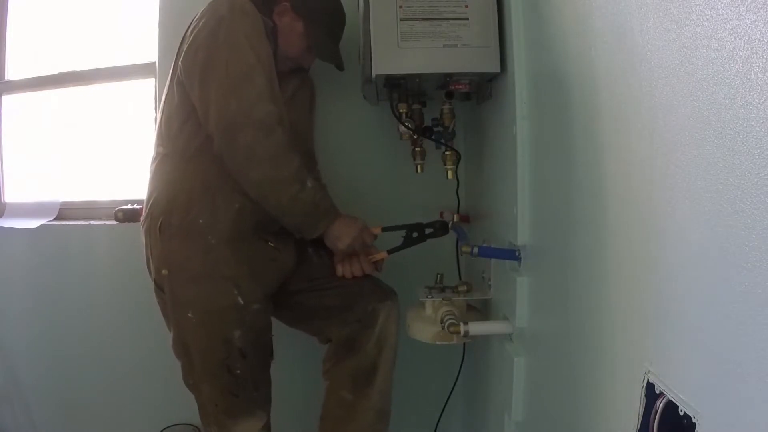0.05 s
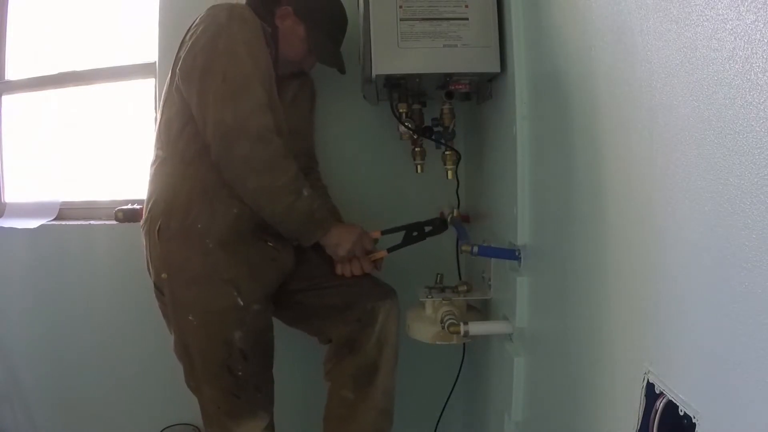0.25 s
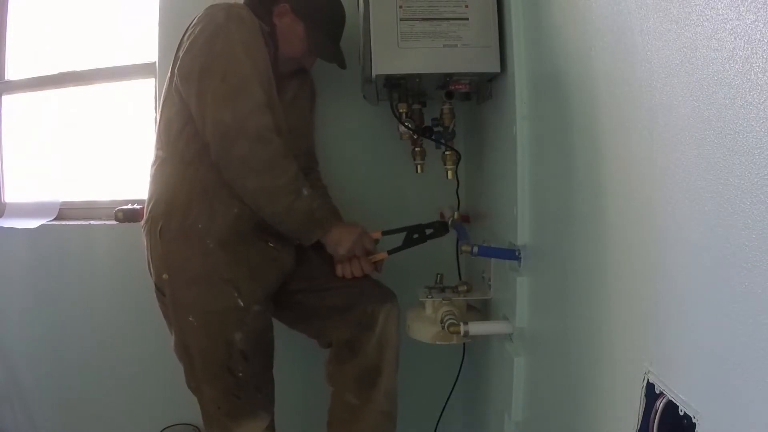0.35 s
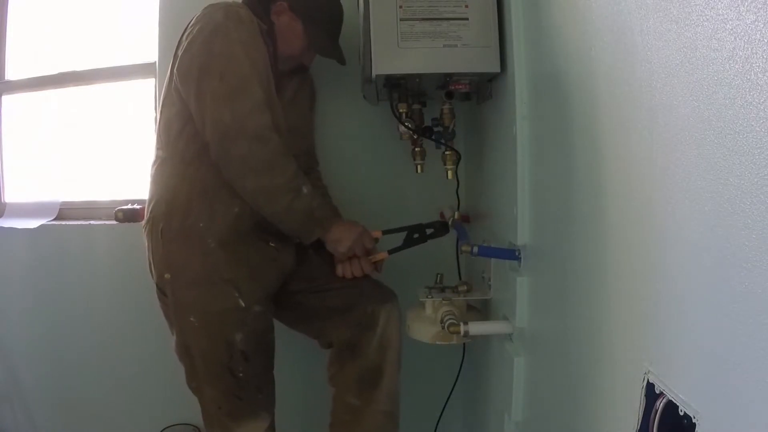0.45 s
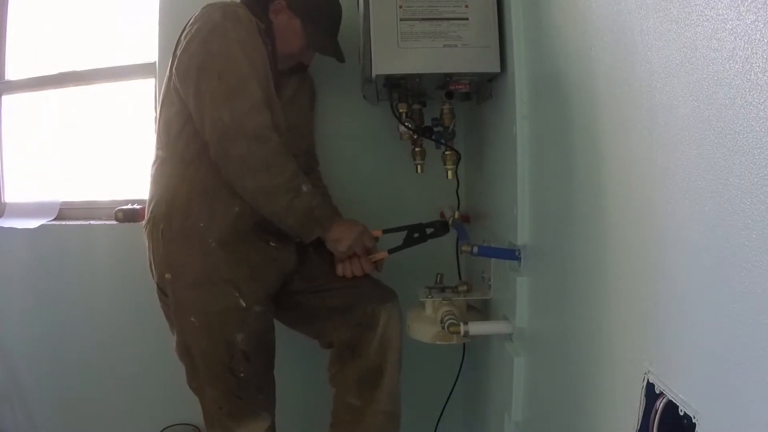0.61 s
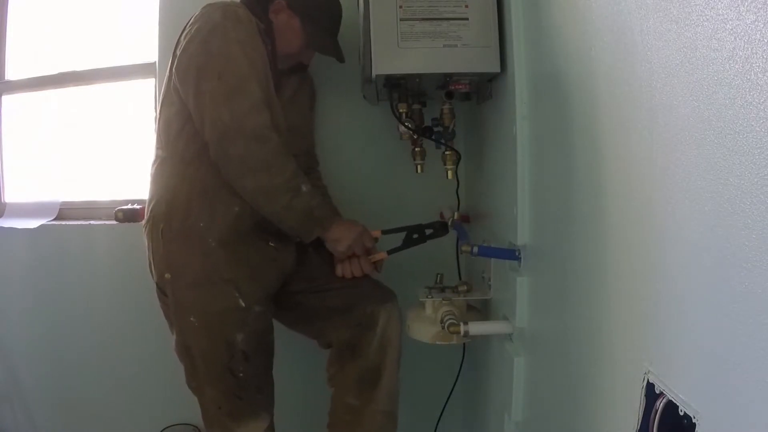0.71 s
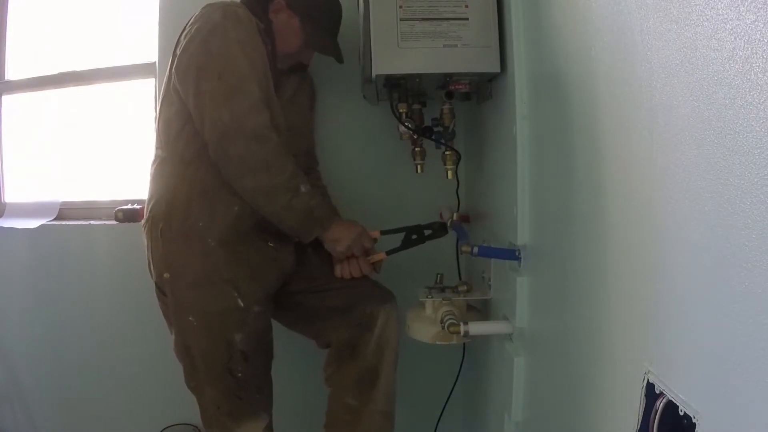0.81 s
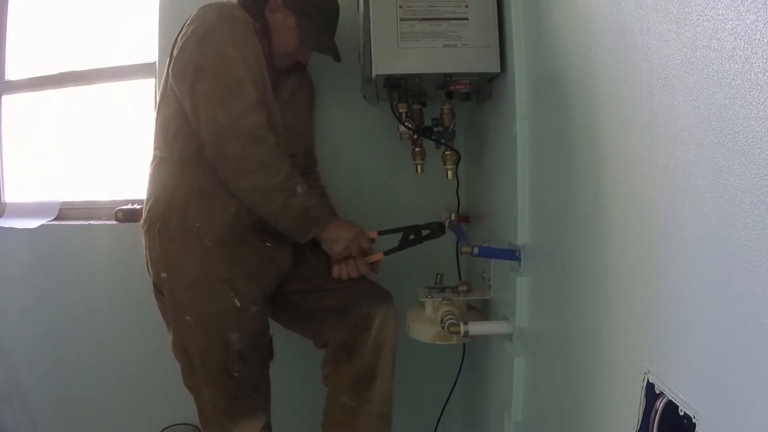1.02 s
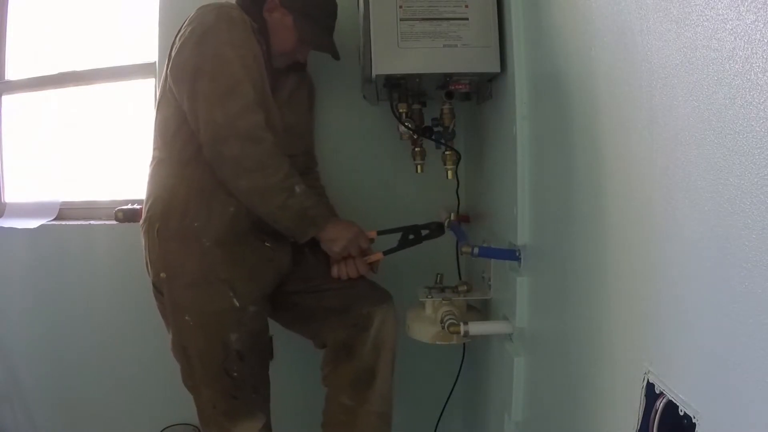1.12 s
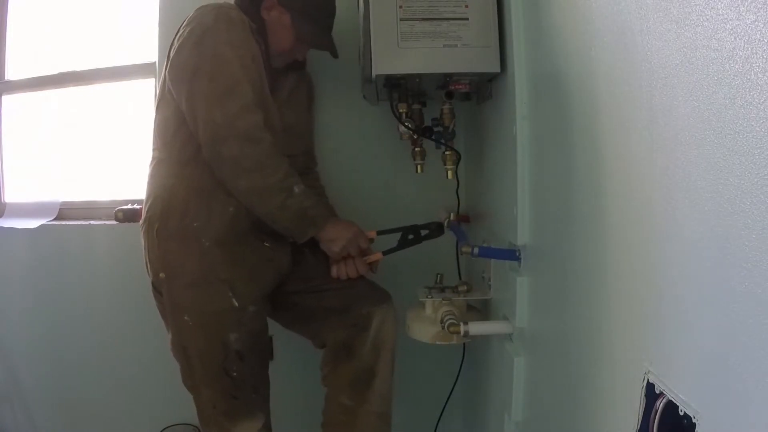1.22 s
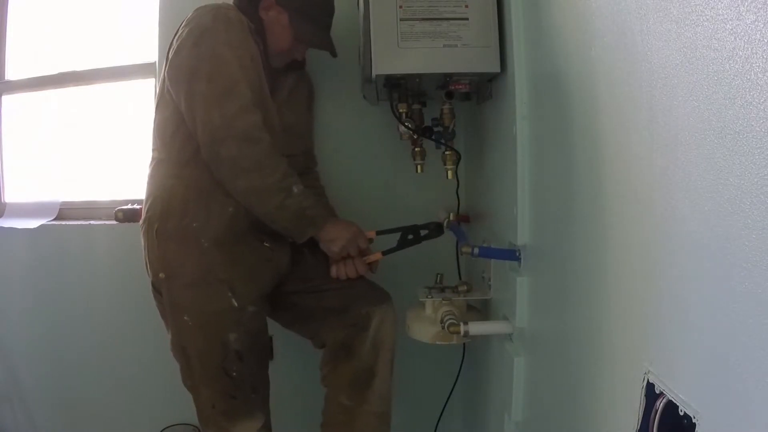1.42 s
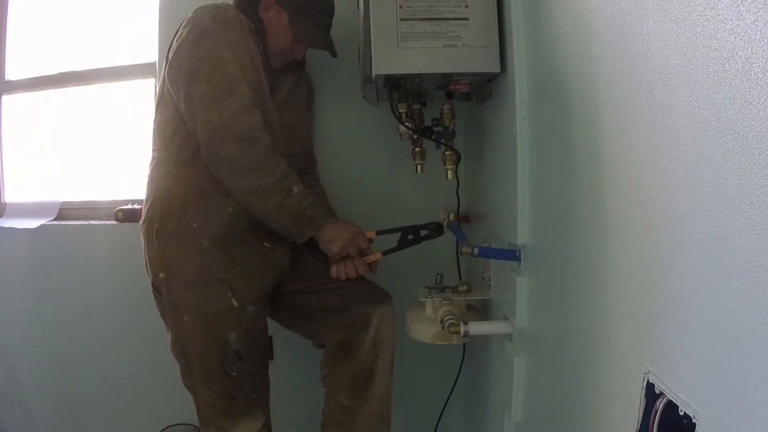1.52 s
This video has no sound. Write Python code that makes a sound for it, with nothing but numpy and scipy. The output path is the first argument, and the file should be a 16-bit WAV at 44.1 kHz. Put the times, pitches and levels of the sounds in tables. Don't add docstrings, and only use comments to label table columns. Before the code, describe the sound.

A hand crimping tool clicks four times through its ratchet, then snaps with a sharp loud crack in a bare hard room; later a small steel scrap pings and the tool knocks dully on pipes, close microphone.

```python
import sys
import numpy as np
from scipy import signal
from scipy.io import wavfile
from scipy.ndimage import uniform_filter1d

SR = 44100
rng = np.random.default_rng(int(sys.argv[2]) if len(sys.argv) > 2 else 0)


def materialize(psi):
    bounded = np.clip(np.atleast_2d(psi).T, -1, 1)
    quanta = np.round(bounded * 32767).astype(np.int16)
    wavfile.write(sys.argv[1], SR, quanta)


def nominal_scale(level):
    x = np.asarray(level, float) / 20
    return 10 ** x


N = 68355
LEAD_S = 0.12
FULL_N = N + round(LEAD_S * SR)


def evened(x):
    return x / np.sqrt(np.mean(x ** 2) + 1e-20)


def read(points, hz):
    f, value = np.transpose(points)
    return np.interp(np.log(hz + 1), np.log(f + 1), value)


def add(mix, start_s, sound):
    part = mix[..., round((start_s + LEAD_S) * SR):][..., :sound.shape[-1]]
    part += sound[..., :part.shape[-1]]


def rings(modes, spread_db=0, rise_s=0):
    t = np.arange(SR) / SR
    out = np.zeros(SR)
    for hz, db, t60, *sign in modes:
        level_db = db + spread_db * rng.standard_normal() - 60 * t / t60
        out += nominal_scale(level_db) * np.sin(2 * np.pi * hz * t) * np.prod(sign)
    if rise_s:
        out *= 1 - np.exp(-t / rise_s)
    return out


def crack(colour, t60):
    def causal(log_gain):
        return np.fft.ifft(np.exp(np.conj(signal.hilbert(log_gain)))).real[:2048]

    log_gain = np.log(nominal_scale(read(colour, abs(np.fft.fftfreq(4096, 1 / SR)))))
    burst = rng.standard_normal(2048) * nominal_scale(-60 * np.arange(2048) / SR / t60)
    chance = uniform_filter1d(abs(np.fft.fft(burst, 4096)) ** 2, size=61, mode="wrap")
    noise = signal.fftconvolve(burst, causal(log_gain - 0.5 * np.log(chance)))
    noise = np.pad(noise, (0, SR))[:SR]
    pulse = np.pad(causal(log_gain), (0, SR))[:SR]
    pulse *= np.linalg.norm(noise) / np.linalg.norm(pulse)
    return np.array([noise, pulse]) / abs(noise).max()


def room(x, wet_db, thin=True):
    # (frequency [Hz], time to fall 60 dB [s])
    tail_times = [(100, .8), (300, 1), (900, 0.96), (2000, 0.88), (4000, 0.75), (8000, 0.52), (14000, 0.41)]
    # (time [s], level [dB])
    reflections = [(.0026, -7), (.0075, -9.5), (.011, -8), (0.0158, -9.5), (0.0187, -18), (0.022, -14)]
    early_db, early_t60, build_s = 5, 0.19, 0.012
    hz, t, z = signal.stft(rng.standard_normal(FULL_N), SR, nperseg=512)
    z = z * nominal_scale(-60 * t / read(tail_times, hz)[:, None])
    tail = signal.istft(z, SR, nperseg=512)[1][:FULL_N]
    t = np.arange(len(tail)) / SR
    tail = tail * (1 + nominal_scale(early_db - 60 * t / early_t60)) * (1 - np.exp(-t / build_s))
    tail = nominal_scale(wet_db) * tail / np.linalg.norm(tail)
    echoes = np.zeros(len(tail))
    echoes[0] = 1
    for delay_s, db in reflections:
        echoes[round(delay_s * SR)] = nominal_scale(db) * rng.choice([-1, 1])
    direct = x[0]
    if thin:
        direct = signal.lfilter(*signal.butter(1, 1800, "high", fs=SR), direct)
    return (signal.fftconvolve(direct, echoes) + signal.fftconvolve(x[1], tail))[:FULL_N]


def air():
    # (frequency [Hz], level [dB per Hz])
    air_colour = [(20, -6), (60, 1), (250, -5.5), (700, -11), (1250, -10), (2200, -18), (7000, -32),
                  (12500, -43.5), (14500, -61)]
    level_db, patch_db = -57.5, 1.5
    hz, t, z = signal.stft(rng.standard_normal(FULL_N), SR, nperseg=2048)
    patches = uniform_filter1d(rng.standard_normal(z.shape), size=8, axis=0)
    patches = evened(uniform_filter1d(patches, size=3, axis=1))
    z = z * nominal_scale(read(air_colour, hz)[:, None] + patch_db * patches)
    return nominal_scale(level_db) * evened(signal.istft(z, SR, nperseg=2048)[1][:FULL_N])


def knock():
    # (time [s], level [dB])
    bumps = [
        (1.146, -49),
        (1.154, -30.5),
        (1.159, -31),
        (1.1665, -30.5),
        (1.174, -39),
        (1.184, -34.5),
    ]
    # (frequency [Hz], level [dB])
    bump_colour = [(150, -47), (350, 0.5), (800, 7.5), (1400, 4), (2300, 6.5), (4500, 5), (7000, -9),
                   (15000, -11)]
    # (frequency [Hz], level [dB], time to fall 60 dB [s])
    pipes = [(335, -4, .05), (600, -9, .04), (700, -8, .05), (790, -6, .05), (1100, -9, .03),
             (1370, -1, .05), (1490, -2, .05), (2250, -5, .05), (3550, -9, .02)]
    ring_db, tail_share = -5, 0.5
    out = np.zeros((2, FULL_N))
    for start_s, db in bumps:
        ring = rings(pipes, spread_db=2)
        ring = nominal_scale(ring_db) * np.outer([1, tail_share], ring) / abs(ring).max()
        add(out, start_s, nominal_scale(db) * (ring + crack(bump_colour, t60=0.015)))
    return room(out, wet_db=3, thin=False)


def offcut():
    # (time [s], tick level [dB], low ring level [dB], high ring level [dB])
    bounces = [(.9768, -22.5, -38.5, -64), (.9848, -44.5, -38, -58), (.9998, -28.5, -37.5, -55),
               (1.0097, -43, -57, -60), (1.032, -36.5, -59, -66), (1.0646, -35, -52, -54),
               (1.0735, -44, -66, -62), (1.085, -56, -47.5, -67), (1.122, -58, -64, -73),
               (1.1556, -37, -66, -72), (1.178, -46, -56, -61), (1.1875, -31, -58, -66),
               (1.198, -72, -61, -40), (1.21, -59, -75, -66), (1.235, -54, -72, -70),
               (1.261, -56, -77, -74), (1.286, -75, -71, -80), (1.325, -50, -70, -66),
               (1.3405, -62, -81, -53), (1.376, -60, -78, -75), (1.4023, -50, -83, -77),
               (1.41, -71, -76, -76), (1.423, -53, -94, -88)]
    # (frequency [Hz], level [dB], time to fall 60 dB [s])
    low_tones = [(12790, -10, .1), (12850, -5, .18), (12905, -4, .1)]
    # (frequency [Hz], level [dB], time to fall 60 dB [s])
    high_tones = [(13440, -2, .11), (13510, -12, .06)]
    # (frequency [Hz], level [dB])
    tick_colour = [(300, -46), (1000, -5.5), (2500, -11), (5800, -7.5), (9000, -10), (15000, -15.5)]
    rise_s = 0.00022
    out = np.zeros((2, FULL_N))
    for start_s, tick_db, low_db, high_db in bounces:
        low = nominal_scale(low_db) * rings(low_tones, 2, rise_s)
        high = nominal_scale(high_db) * rings(high_tones, 2, rise_s)
        add(out, start_s, nominal_scale(tick_db) * crack(tick_colour, t60=0.0025) + low + high)
    return room(out, wet_db=1.5)


def ratchet():
    # (time [s], level [dB])
    teeth = [
        (-.03, -24),
        (0.0493, -20),
        (0.108, -21.5),
        (0.1517, -19),
        (0.1969, -18.5),
    ]
    # (frequency [Hz], level [dB], time to fall 60 dB [s])
    pawl = [(3380, -2, .025), (3580, -1, .02), (3900, -6, .015), (5150, -6, .015), (5500, -8, .012),
            (5885, -5, .03), (10700, -20, .01)]
    # (frequency [Hz], level [dB])
    tooth_colour = [(400, -36), (1400, -29), (2700, -10.5), (3550, -3.5), (4500, -10), (5600, -3),
                    (6600, -11.5), (15000, -21.5)]
    ring_db, tail_share = 1, 0.5
    out = np.zeros((2, FULL_N))
    for start_s, db in teeth:
        ring = rings(pawl, spread_db=2)
        ring = nominal_scale(ring_db) * np.outer([1, tail_share], ring) / abs(ring).max()
        add(out, start_s, nominal_scale(db) * (ring + crack(tooth_colour, t60=0.011)))
    return room(out, wet_db=4)


def snap():
    # (frequency [Hz], level [dB])
    snap_colour = [(60, -30.5), (150, -13.5), (500, -11), (950, -6), (1500, -6), (3400, -4.5),
                   (6600, -11.5), (15000, -29)]
    # (frequency [Hz], level [dB], time to fall 60 dB [s])
    jaws = [(1063, -17, .08), (1580, -10, .03), (2413, -9, .02), (3030, -4, .025), (3300, -5, .02),
            (3530, -3, .025), (4005, -2, .025), (13200, -30, .03), (13450, -30, .05)]
    # (frequency [Hz], level [dB], time to fall 60 dB [s], sign [+1 or -1])
    panel = [(140, -12, .4, 1), (190, -9, .5, 1), (200, -11, .5, -1), (236, 0, .3, 1), (246, -5, .35, -1),
             (278, -10, .7, -1), (298, -9, .7, 1), (318, 0, .3, -1), (308, -5, .35, 1), (830, 4, .13, 1),
             (870, 1, .1, -1)]
    hum = [(78.3, -39, 1.0, 1), (83.3, -39, 1.0, -1)]
    snap_s, snap_db, slip_db = 0.2091, 2.5, -25.5
    jaws_db, jaws_tail_share = -9, 0.3
    panel_db, push_db, push_s = -21, -39, 0.006
    out, wall = np.zeros((2, FULL_N)), np.zeros(FULL_N)
    add(out, snap_s - 0.0008, nominal_scale(slip_db) * crack(snap_colour, t60=0.004))
    jaw_ring = nominal_scale(jaws_db) * np.outer([1, jaws_tail_share], rings(jaws))
    add(out, snap_s, nominal_scale(snap_db) * (crack(snap_colour, t60=0.015) + jaw_ring))
    t = np.arange(SR) / SR
    push = nominal_scale(push_db) * np.e * t / push_s * np.exp(-t / push_s)
    add(wall, snap_s, nominal_scale(panel_db) * rings(panel, rise_s=0.01) + rings(hum) + push)
    return room(out, wet_db=1.5) + wall


def scene():
    mix = air() + knock() + offcut() + ratchet() + snap()
    return mix[None, FULL_N - N:]


def band_limit(x):
    return signal.sosfilt(signal.butter(12, 16070, fs=SR, output="sos"), x)


def record(dry):
    treble_edge = signal.firwin(127, 15300, fs=SR)
    x = signal.oaconvolve(dry, treble_edge[None], "same")
    return band_limit(np.clip(x, -1.0, 1.0))


dry = scene()
out = record(dry)
materialize(out)
```